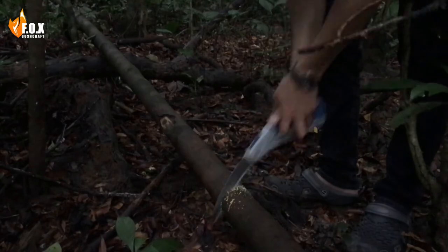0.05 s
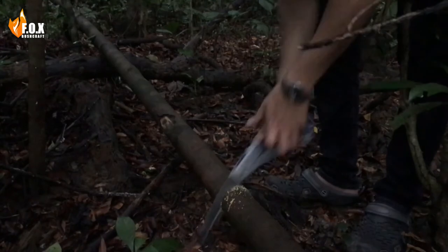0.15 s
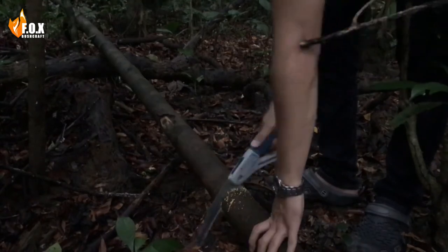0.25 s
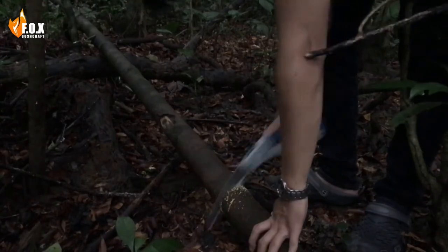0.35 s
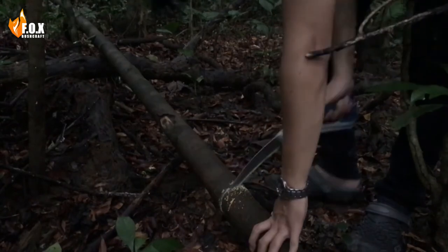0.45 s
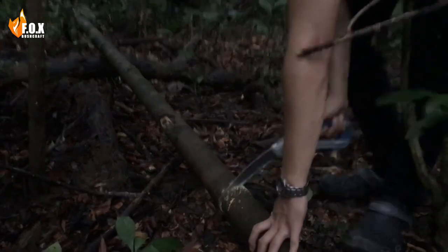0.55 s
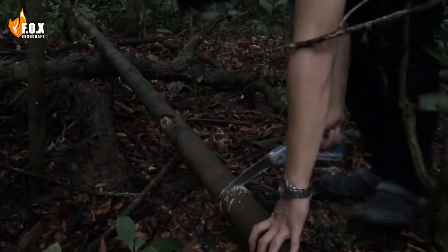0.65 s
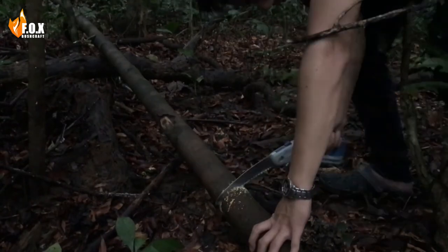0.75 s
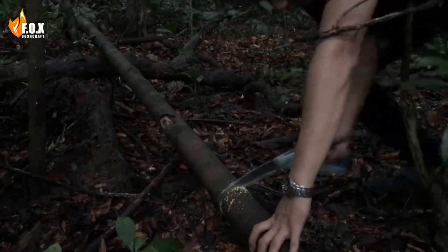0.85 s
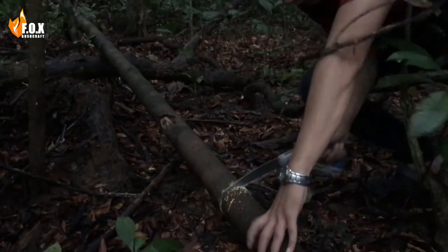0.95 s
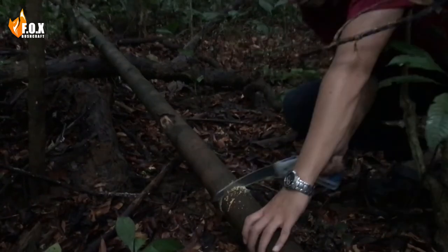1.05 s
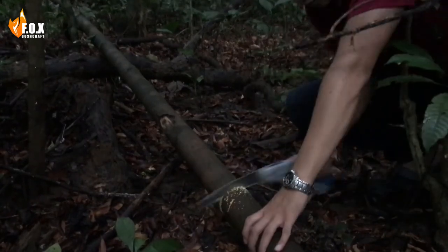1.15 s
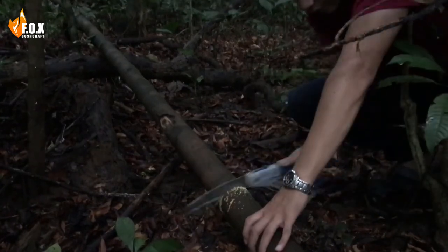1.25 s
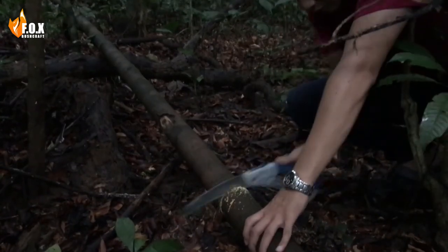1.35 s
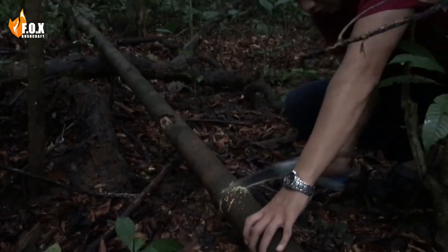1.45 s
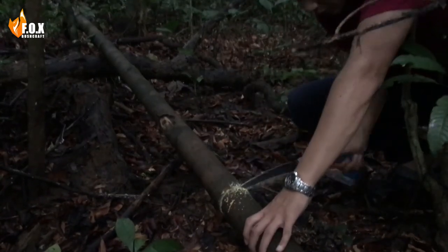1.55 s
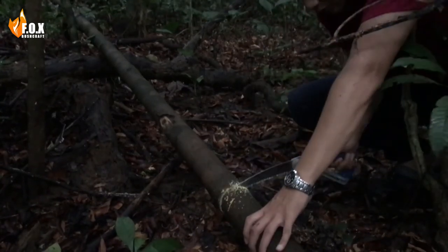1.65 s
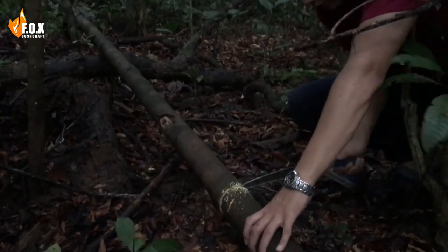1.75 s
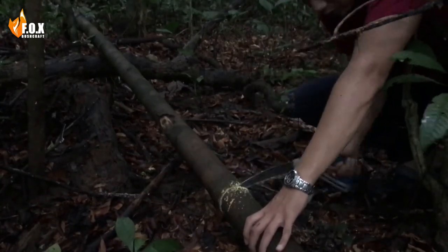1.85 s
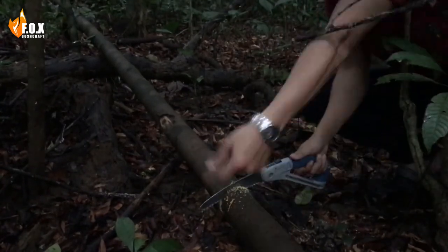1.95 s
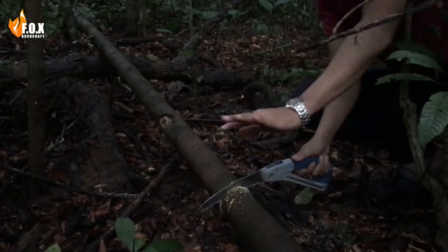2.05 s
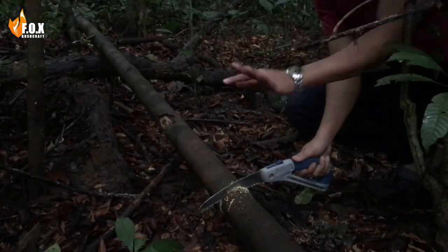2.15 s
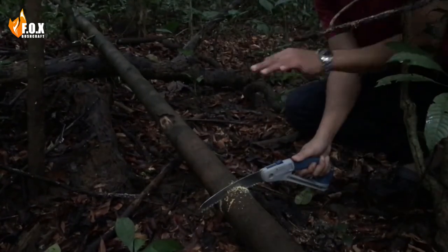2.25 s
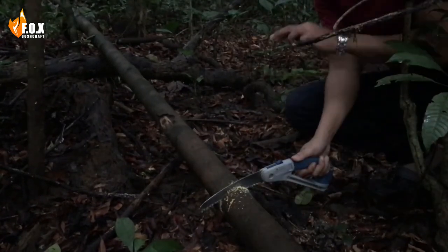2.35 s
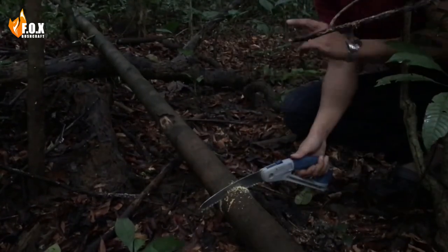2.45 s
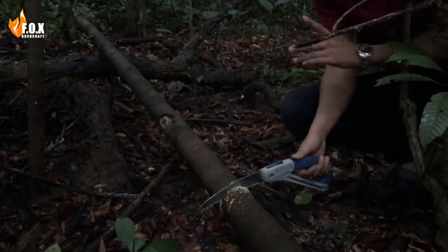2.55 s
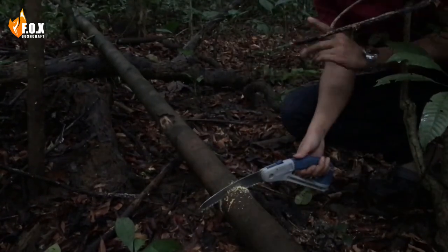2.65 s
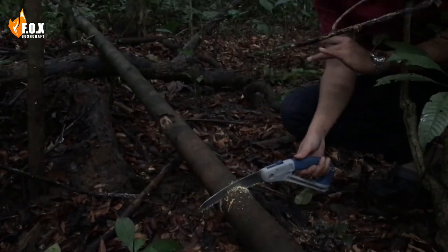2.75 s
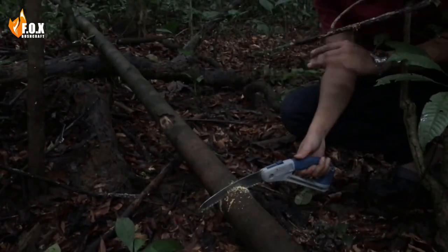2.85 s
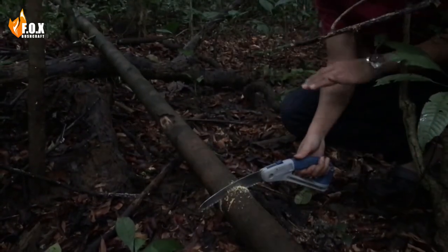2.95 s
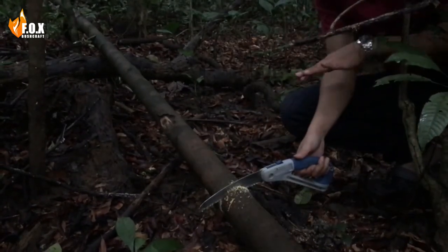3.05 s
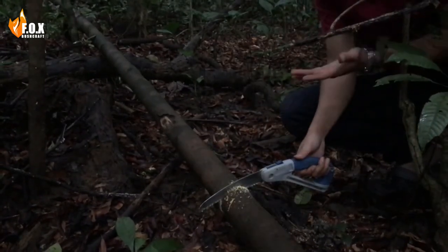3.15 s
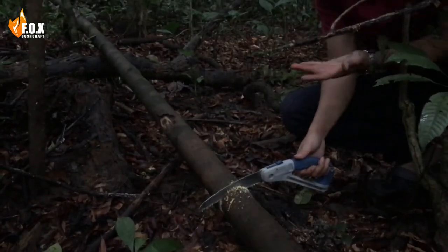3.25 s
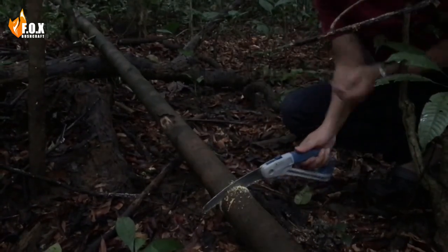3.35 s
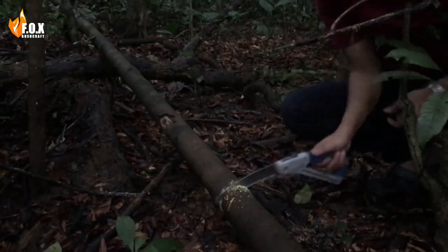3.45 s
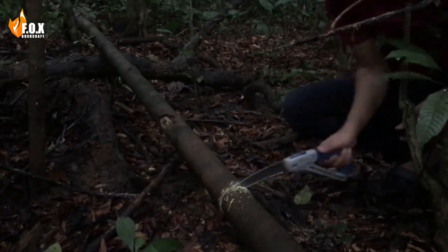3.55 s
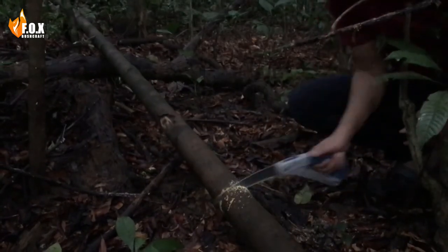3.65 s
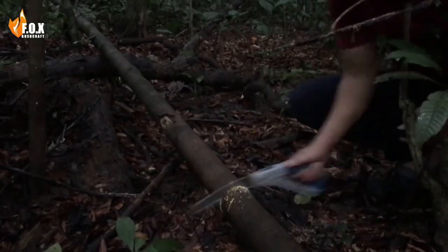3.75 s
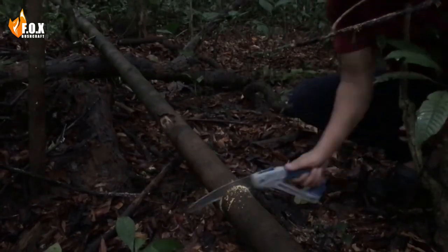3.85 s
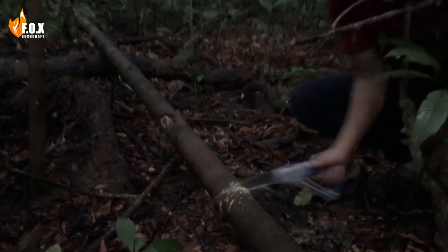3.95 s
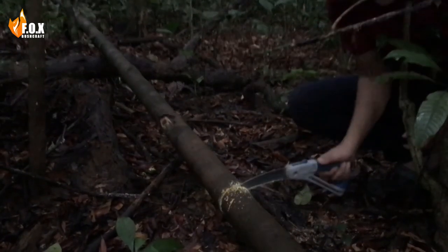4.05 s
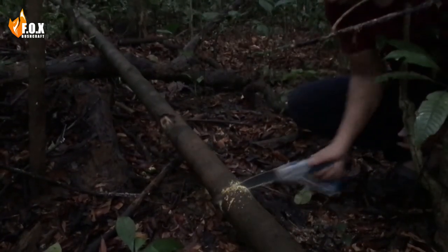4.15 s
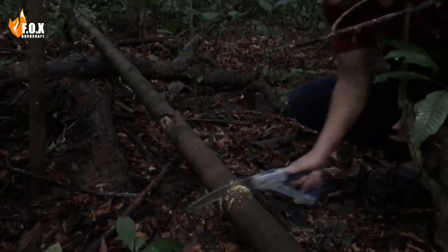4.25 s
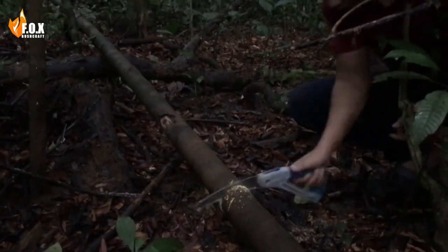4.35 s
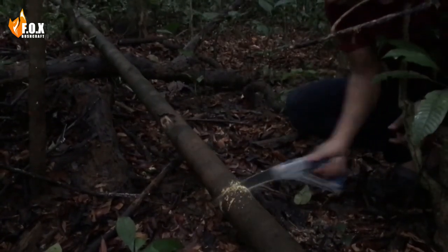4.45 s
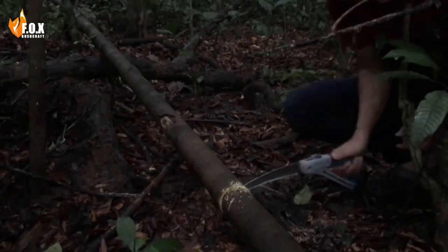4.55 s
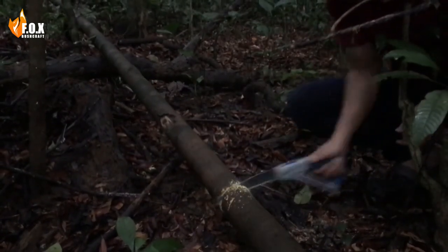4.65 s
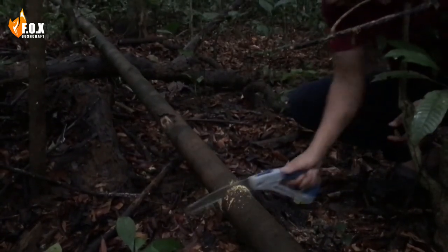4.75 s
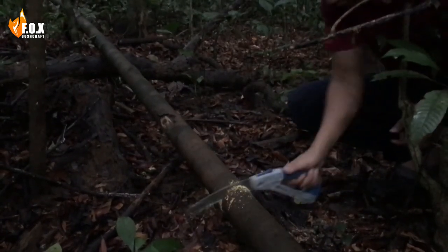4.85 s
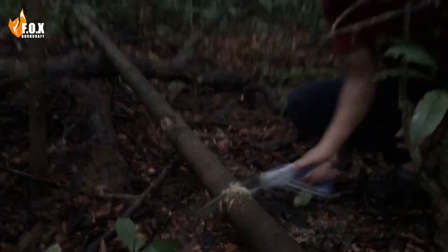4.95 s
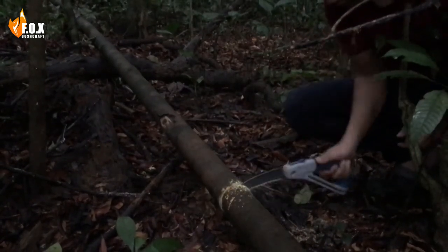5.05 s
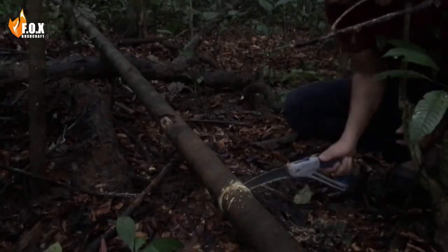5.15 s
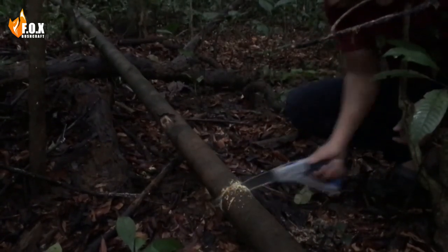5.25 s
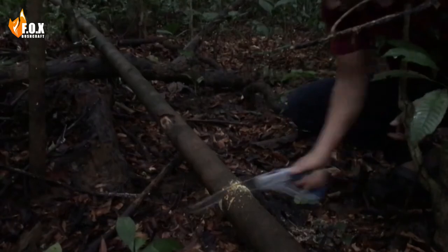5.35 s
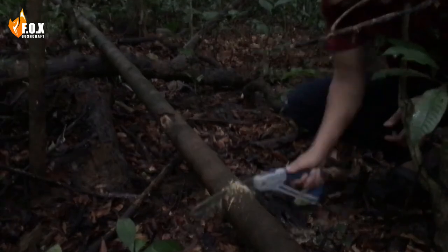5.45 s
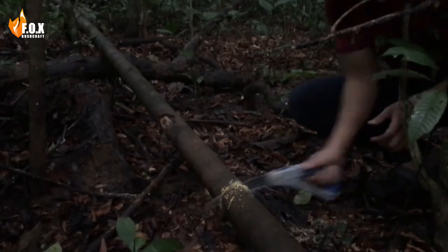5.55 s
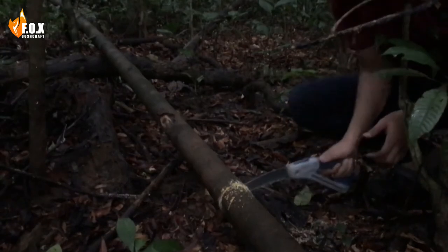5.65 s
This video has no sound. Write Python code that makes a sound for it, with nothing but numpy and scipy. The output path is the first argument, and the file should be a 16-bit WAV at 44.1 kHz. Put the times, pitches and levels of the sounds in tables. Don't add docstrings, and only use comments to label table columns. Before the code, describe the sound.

In a quiet forest, a toothed blade tears quickly back and forth through wood, bright and gritty, with metallic ringing and hollow log knocks. After about two seconds it stops; bark is scuffed, litter settles, a cricket ticks regularly. Sawing resumes at the same frantic pace until a sharp splintering crack near the end. Close single microphone, faint scatter from trees.

```python
import sys
import numpy as np
from scipy import signal
from scipy.fft import rfft, irfft, next_fast_len
from scipy.io import wavfile
from scipy.ndimage import uniform_filter1d

SR = 44100
rng = np.random.default_rng(int(sys.argv[2]) if len(sys.argv) > 2 else 0)


def put_to_file(sound):
    columns = np.atleast_2d(sound).T
    safe = np.clip(columns, -1, 1)
    whole_steps = np.round(safe * 32767)
    wavfile.write(sys.argv[1], SR, whole_steps.astype(np.int16))


def gain_from_db(level_db):
    decades = np.asarray(level_db, float) / 20
    return 10 ** decades


N = 251370
TIME = np.arange(N) / SR

CUT_END_S = [0.765, 1.872, 5.705]
# time_s, peak_db, pitch_hz, length_s
JOLTS = [
    (0.26, -34.5, 340, .02),
    (0.554, -34, 496, 0.016),
    (1.283, -36, 310, 0.019),
    (1.451, -43, 322, 0.022),
    (1.836, -38.5, 508, 0.016),
    (3.874, -29.5, 319, 0.025),
    (4.209, -28.5, 327, 0.017),
    (5.045, -24.5, 302, 0.022),
    (5.481, -28.5, 310, 0.014),
    (5.64, -37, 403, 0.013),
]
# mode_hz, width_hz, level_db
SING_MODES = [(1691, 149, 4.5), (1814, 66, 6.5)]


def unit(x):
    return x / np.sqrt(np.mean(x ** 2) + 1e-20)


def filtered(x, response):
    m = next_fast_len(N + 8192)
    return irfft(rfft(x, m) * response(np.fft.rfftfreq(m, 1 / SR)), m)[:N]


def coloured(x, points):
    hz, db = np.transpose(points)
    return unit(filtered(x, lambda f: gain_from_db(np.interp(np.log(f + 1), np.log(hz), db))))


def ringing(x, modes, flip=-1):
    def response(f):
        total = 0
        for k, (centre_hz, width_hz, db) in enumerate(modes):
            damping = 1j * f * width_hz
            total = total + flip ** k * gain_from_db(db) * damping / (centre_hz ** 2 - f * f + damping)
        return total
    return unit(filtered(x, response))


def patchy(depth_db, bins, frames):
    z = signal.stft(rng.standard_normal(N + 512), nperseg=256)[2]
    field = uniform_filter1d(rng.standard_normal(z.shape), bins, 0)
    field = uniform_filter1d(field, frames, 1)
    return unit(signal.istft(z * gain_from_db(depth_db * unit(field)), nperseg=256)[1][:N])


def grit(rate, spread_db, share):
    chance, size, sign = rng.random(N), rng.exponential(size=N), rng.standard_normal(N)
    grains = unit((chance < rate / SR) * np.sign(sign) * gain_from_db(spread_db * np.minimum(size, 3.5)))
    share = np.clip(share, 0, 1)
    return np.sqrt(share) * grains + np.sqrt(1 - share) * patchy(depth_db=3.5, bins=5, frames=5)


def swell(start_s, length_s, rise):
    u = np.clip((TIME - start_s) / length_s, 0, 1)
    return np.sin(np.pi * u ** (np.log(.5) / np.log(np.clip(rise, .05, .95))))


def forest():
    # freq_hz, level_db (per Hz)
    hiss_points = [(180, -22), (300, -2), (370, -14), (519, -11), (1270, -18), (2910, -13), (4600, -8),
                   (5050, -22.5), (5700, -13), (6780, -13.5), (7620, -28), (10600, -14.5), (15800, 2.5)]
    # freq_hz, level_db (per Hz)
    rumble_points = [(15, -53), (25, -25), (54, -0.5), (97, -2), (134, -9.5), (179, -7), (215, -15),
                     (450, -29), (580, -31), (990, -120)]
    # mode_hz, width_hz, level_db
    cicada_modes = [(2356, 50, 1.5), (2980, 45, 2), (3800, 110, -4), (5570, 99, -13)]
    hiss = gain_from_db(-55.5) * coloured(patchy(depth_db=2.5, bins=4, frames=20), hiss_points)
    chorus = gain_from_db(-76.5) * ringing(patchy(depth_db=2.0, bins=3, frames=15), cicada_modes)
    rumble = gain_from_db(-58.5) * coloured(rng.standard_normal(N), rumble_points)
    return hiss + chorus + rumble


def leaves():
    # freq_hz, level_db (per Hz)
    litter_points = [(300, -16), (700, -6.5), (3000, -5.5), (6000, -6.5), (10000, -18.5), (15000, -17)]
    stirred_db, settled_db, settle_s = -58.5, -79.5, 1
    stirred = np.exp(-np.maximum(TIME - CUT_END_S[1], 0) / settle_s)
    level = gain_from_db(settled_db + (stirred_db - settled_db) * stirred)
    return level * coloured(grit(rate=820, spread_db=6, share=0.093), litter_points)


def chirps():
    # start_s, length_s, pitch_hz, width_hz, level_db
    chirp_events = [
        (1.938, 0.013, 6500, 500, -55),
        (2.098, 0.02, 8840, 400, -48),
        (2.16, 0.029, 9700, 300, -68),
        (2.978, 0.027, 5330, 494, -60),
        (2.976, 0.048, 8900, 150, -59),
        (3.007, 0.024, 8700, 600, -53.5),
    ]
    cricket_start_s = [2.205, 2.407, 2.618, 2.826, 3.034, 3.243, 3.468]
    # length_s, pitch_hz, level_db
    cricket_note = (0.025, 6700, -66)
    noise = rng.standard_normal(N)

    def band(hz, width_hz):
        mode = [(hz, width_hz, 0)]
        return ringing(ringing(noise, mode), mode)

    call_s, note_hz, note_db = cricket_note
    note = np.sin(2 * np.pi * note_hz * TIME) + .4 * band(note_hz, 150)
    out = gain_from_db(note_db) * note * sum(swell(s, call_s, rise=.45) for s in cricket_start_s)
    for start_s, length_s, hz, width_hz, db in chirp_events:
        out = out + gain_from_db(db) * swell(start_s, length_s, rise=0.34) * band(hz, 2.1 * width_hz)
    return out


def scuffs():
    # start_s, length_s, hollow_db, hiss_db
    rubs = [
        (2.067, 0.11, -79, -53),
        (2.233, 0.093, -46, -49),
        (2.42, 0.061, -68, -77),
        (2.465, 0.086, -39.5, -37),
        (2.724, 0.021, -64, -66),
        (2.874, 0.024, -81, -61),
        (2.975, 0.083, -87, -62),
        (3.252, .04, -80, -69),
        (3.405, 0.081, -47, -55),
    ]
    # mode_hz, width_hz, level_db
    hollow_modes = [(520, 330, -12.5), (1010, 53, 0.5), (1196, 82, 4), (1320, 130, 4), (1780, 1100, -6.5),
                    (2550, 120, -2), (3400, 190, -2)]
    # freq_hz, level_db (per Hz)
    bark_points = [(300, -2), (700, -6), (2000, -4.5), (5000, 0), (10000, -5), (15000, -4.5)]
    hollow = ringing(grit(rate=1200, spread_db=-4.0, share=0.69), hollow_modes)
    hiss = coloured(grit(rate=3200, spread_db=-2.5, share=0.15), bark_points)
    out = np.zeros(N)
    for start_s, length_s, hollow_db, hiss_db in rubs:
        rub = gain_from_db(hollow_db) * hollow + gain_from_db(hiss_db) * hiss
        out += swell(start_s, length_s, rise=0.24) ** 3.5 * rub
    return out


def cracks():
    # start_s, length_s, level_db
    bursts = [
        (4.906, 0.024, -33),
        (5.544, 0.03, -19.5),
    ]
    # mode_hz, width_hz, level_db
    splinter_modes = [(778, 110, 6), (1064, 110, 7.5), (1556, 150, 10.5), (2950, 1300, -5), (4670, 380, -1),
                      (5820, 150, 3.5), (7000, 410, -3.5), (10900, 4800, -9.5)]
    burst = ringing(grit(rate=1200, spread_db=5.5, share=0.36), splinter_modes)
    return burst * sum(gain_from_db(db) * swell(s, length_s, rise=0.48) ** 2.0 for s, length_s, db in bursts)


def jolts():
    out, t = np.zeros(N + SR), np.arange(SR // 20) / SR
    decay_db = -60 * t / 0.041
    for (s, db, hz, length_s), luck in zip(JOLTS, rng.random((len(JOLTS), 8))):
        swing = np.sin(2 * np.pi * hz * t) * np.minimum(t * hz * 1.23, 1)
        for ratio, gain in ((2.66, .4), (1.83, .32), (3.7, .39)):
            swing += gain * np.sin(2 * np.pi * ratio * hz * t)
        pushes = luck.reshape(4, 2) * [1, .7] + [[k, .3] for k in range(4)]
        for when, size in pushes:
            start = round((s + (when - .5) * length_s / 4) * SR)
            out[start:][:len(t)] += gain_from_db(db + decay_db) * size * swing
    return out[:N]


def flares():
    # peak_s, level_db
    catches = [(.312, -40), (.442, -37), (.615, -40), (.7, -36.5), (1.1, -36), (1.232, -37.5),
               (1.575, -32.5), (1.75, -45), (3.922, -41), (4.0, -32), (4.079, -42), (4.41, -41),
               (4.745, -46), (5.17, -36), (5.43, -39), (5.52, -30), (5.69, -35)]
    length_s = 0.023
    ring = ringing(grit(rate=900, spread_db=0.5, share=.3), SING_MODES)
    return ring * sum(gain_from_db(db) * swell(s - length_s / 2, length_s, rise=0.56) ** 1.7 for s, db in catches)


def strokes():
    # start_s, turning_db, push_db, pull_db
    first_cut = [(-.024, -55, -43, -40), (0.063, -55, -41.5, -42), (0.153, -51.5, -42.5, -40),
                 (0.244, -70, -39, -36), (.33, -56, -41.5, -35), (0.414, -56, -38, -35.5),
                 (0.496, -56.5, -42.5, -36.5), (.58, -60, -42, -39.5), (0.667, -64, -41, -41.5)]
    # start_s, turning_db, push_db, pull_db
    second_cut = [(0.988, -55, -43, -41), (1.074, -57, -44.5, -41.5), (1.163, -56.5, -43, -39.5),
                  (1.251, -59, -40.5, -35.5), (1.335, -54, -41, -36), (1.42, -55.5, -35.5, -34.5),
                  (1.507, -89, -39.5, -36), (1.592, -64, -39.5, -35.5), (1.682, -64, -38.5, -37.5),
                  (1.78, -51, -42, -37.5)]
    # start_s, turning_db, push_db, pull_db
    third_cut = [(3.496, -60, -48, -42), (3.587, -72, -44, -38.5), (3.676, -60, -43.5, -38),
                 (3.762, -53, -42.5, -37.5), (3.846, -53.5, -39.5, -36), (3.93, -56, -42.5, -37.5),
                 (4.01, -61, -38, -34.5), (4.093, -49, -41.5, -37.5), (4.173, -50.5, -37.5, -31.5),
                 (4.26, -54.5, -42, -39.5), (4.344, -57, -39.5, -36.5), (4.431, -65.5, -41, -38.5),
                 (4.516, -58.5, -41, -38.5), (4.599, -55, -41.5, -37), (4.682, -56, -42, -37.5),
                 (4.763, -51.5, -40.5, -39.5), (4.846, -50.5, -40.5, -33), (4.93, -58, -39, -36.5),
                 (5.015, -54.5, -38.5, -36.5), (5.103, -51.5, -40, -36), (5.187, -75, -40.5, -35),
                 (5.274, -52.5, -39, -35), (5.362, -49, -41, -37), (5.448, -58, -39.5, -34),
                 (5.537, -63, -38.5, -37.5), (5.621, -56, -40, -36.5)]
    # start_s, length_s, level_db
    nudges = [
        (0.757, 0.049, -53.5),
        (.802, 0.089, -52),
        (0.886, 0.058, -45.5),
        (0.938, 0.054, -40.5),
        (1.984, 0.084, -52.5),
    ]
    push_s, push_rise_s, pull_rise_s = 0.041, 0.028, 0.021
    reversal_db = -13.5
    bind_s, bind_db = 0.016, 3
    jolt_s = np.transpose(JOLTS)[0]
    runs = []
    for cut, end_s in zip((first_cut, second_cut, third_cut), CUT_END_S):
        rows = []
        for s, rest_db, push_db, pull_db in cut:
            turn_s = s + push_s
            bound_db = bind_db * np.exp(-(np.abs(jolt_s - turn_s).min() / bind_s) ** 2)
            rows.append((s, rest_db, push_rise_s, push_db, 0))
            rows.append((turn_s, pull_db + reversal_db + bound_db, pull_rise_s, pull_db, 1))
        runs.append((rows, end_s))
    for s, length_s, db in nudges:
        runs.append(([(s, db - 13.5, 0.47 * length_s, db, 0)], s + length_s))
    return runs


def stroke_force(rows, end_s, lag_s, extra_db, build, stop, rest_db):
    turn_s, low_db, rise_s, top_db = np.transpose(rows)[:4]
    low = np.append(gain_from_db(low_db + np.mean(extra_db) + rest_db), 0)
    marks_s = np.append(np.ravel([turn_s, turn_s + rise_s + lag_s], "F"), end_s)
    phase = np.interp(TIME, marks_s, np.arange(len(marks_s)) / 2)
    k = np.minimum(phase.astype(int), len(turn_s) - 1)
    u = phase - k
    base = np.where(u < .5, low[k], low[k + 1])
    shape = np.abs(np.sin(np.pi * u)) ** np.where(u < .5, build, stop)
    return (base + (gain_from_db(top_db + extra_db)[k] - base) * shape) * (TIME > turn_s[0])


def saw():
    # freq_hz, level_db (per Hz)
    rasp_points = [(2120, -7.5), (3600, -2), (3930, -1.5), (5000, -5), (5910, -1), (6480, -4.5), (7020, -1),
                   (7660, -6), (8460, -2.5), (10600, -6.5), (11800, -2), (15100, -6.5), (15800, -3.5)]
    # mode_hz, width_hz, level_db
    blade_modes = [(1476, 133, -5), (2155, 183, -3.5), (2928, 310, -1.5), (3320, 183, -2.5),
                   (4010, 390, -14)]
    # mode_hz, width_hz, level_db
    log_modes = [(176, 12.5, 1.5), (310, 20.3, 2), (512, 92, -2), (668, 88, 2), (1065, 273, -0.5)]
    # mode_hz, width_hz, level_db
    shake_modes = [(90, 61, 0)]
    # time_s, song_db (how freely it sings), bite_db (how deep it bites)
    slot = [(0, -3, -5), (.3, -2, -5.5), (.55, -9, -3.5), (.75, -1, -2), (1.1, -2.5, -2.5),
            (1.45, -3, -2.5), (1.85, -2, -0.6), (3.5, -3, 0.5), (3.8, -5, 0), (4.1, -1, -3.3),
            (4.5, -3.7, 1), (4.75, -2.8, 2.2), (5.05, -5.5, -.3), (5.3, -5, 1.5), (5.7, -4.9, 1.5)]
    usual_db, weakest_db = -38.5, -36.5
    rest_sing_db = 0.5

    rasp = coloured(grit(rate=4000, spread_db=0.5, share=0.19), rasp_points)
    blade = ringing(grit(rate=2000, spread_db=4.5, share=0.54), blade_modes)
    songs = [gain_from_db(mode[-1]) * ringing(grit(rate=780, spread_db=1, share=0.12), [mode]) for mode in SING_MODES]
    log = ringing(grit(rate=880, spread_db=0.5, share=0.41), log_modes)
    shake = ringing(rng.standard_normal(N), shake_modes)
    # trim_db, pull_db (extra on a pull), scatter_db, build, stop
    layers = [(rasp, .001, 1, [0, 0], 2.5, 0, 0, 1.6, 1.2),
              (blade, .002, .7, [0, 1], -2.2, .3, 1.5, 1.6, 1.2),
              *[(song, .004, .8, [1, 0], -7.5, 1.5, 2.5, 2.5, 1.5) for song in songs],
              (log, .0005, .6, [-.2, -.2], -4.5, -3, 1.5, 1.3, 1.3),
              (shake, .0005, .9, [.1, .1], -16.5, -.4, 1.5, .6, .6)]
    slot_s, *slot_db = np.transpose(slot)
    out = np.zeros(N)
    for rows, end_s in strokes():
        turn_s, full_db, pull = np.transpose(rows)[[0, 3, 4]]
        free_db = [np.interp(turn_s, slot_s, db) for db in slot_db]
        strength_db = np.maximum(full_db, weakest_db) - usual_db
        luck = rng.standard_normal((len(rows), len(layers)))
        for layer, chance in zip(layers, luck.T):
            sound, lag_s, follows, frees, trim_db, pull_db, scatter_db, build, stop = layer
            extra_db = trim_db + pull_db * pull + (follows - 1) * strength_db
            extra_db = extra_db + np.dot(frees, free_db) + scatter_db * chance
            rest_db = rest_sing_db * frees[0]
            out += sound * stroke_force(rows, end_s, lag_s, extra_db, build, stop, rest_db)
    return out


def trees(x):
    t = np.arange(SR // 8) / SR
    tail = rng.standard_normal(len(t)) * gain_from_db(-60 * t / 0.016)
    return signal.fftconvolve(x, tail / np.linalg.norm(tail))[:N]


def scene():
    far = forest() + leaves() + chirps()
    near = scuffs() + cracks() + jolts() + flares() + saw()
    return (near + gain_from_db(-16) * trees(near) + far)[None]


def low_pass(x):
    return signal.sosfilt(signal.butter(12, 17000, fs=SR, output="sos"), x)


def record(dry):
    mix = filtered(dry[0], lambda hz: (hz < 15830) * hz / np.hypot(hz, 25))[None]
    return low_pass(mix)


dry = scene()
out = record(dry)
put_to_file(out)
```